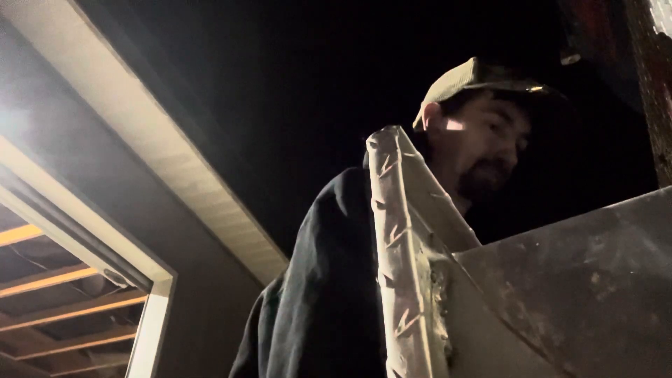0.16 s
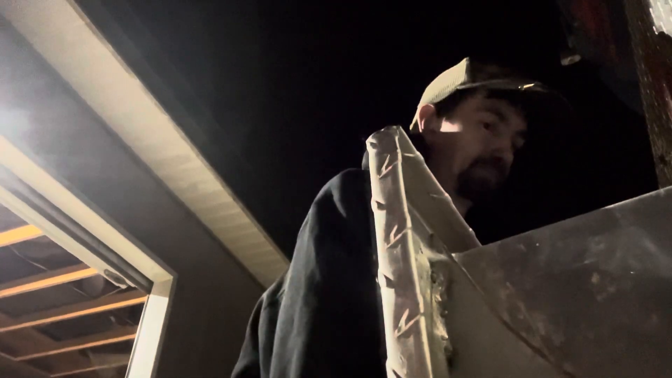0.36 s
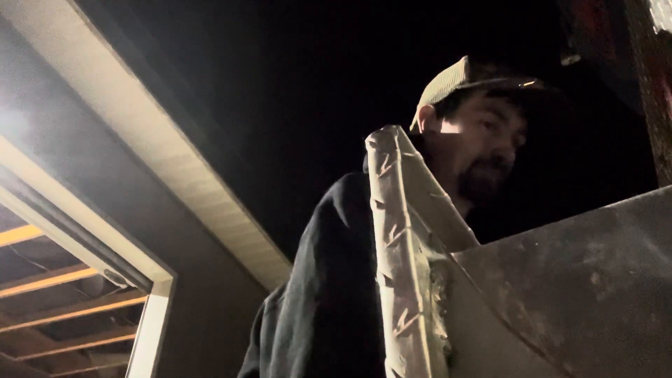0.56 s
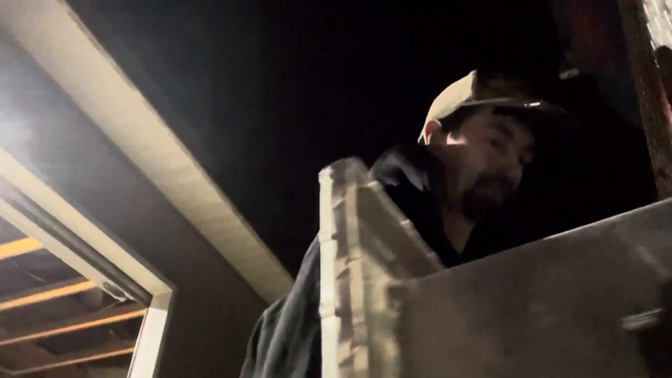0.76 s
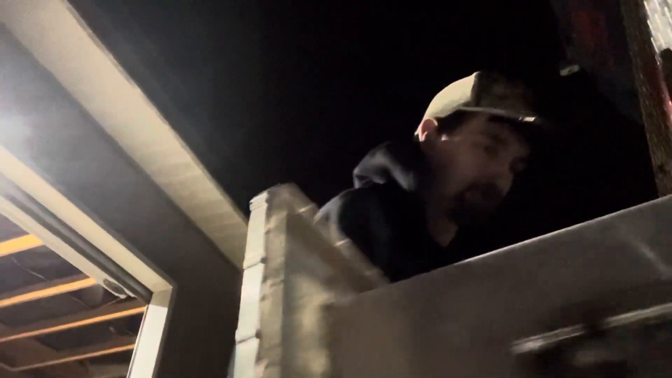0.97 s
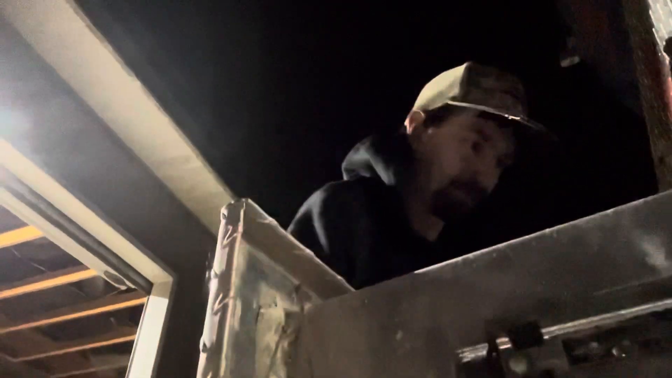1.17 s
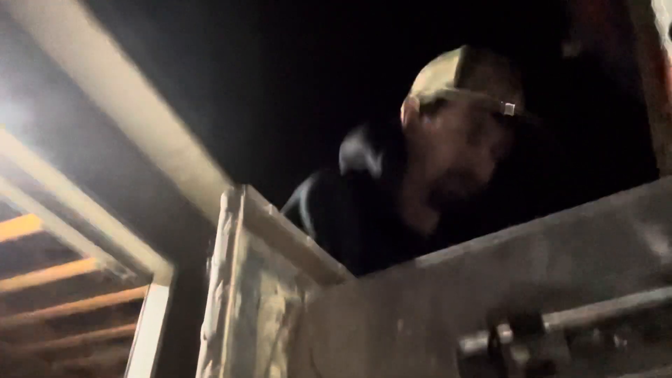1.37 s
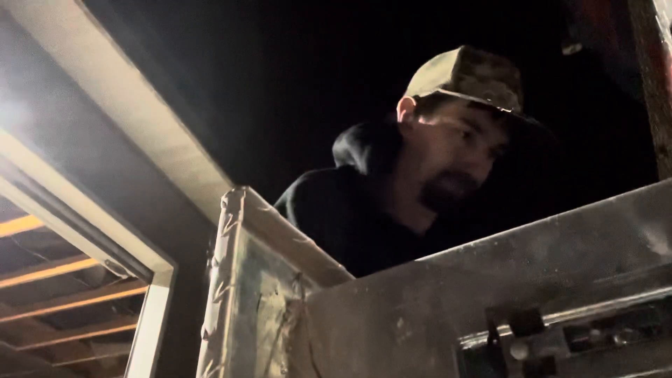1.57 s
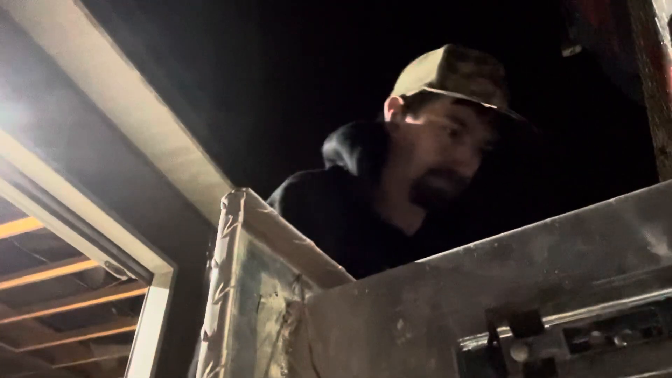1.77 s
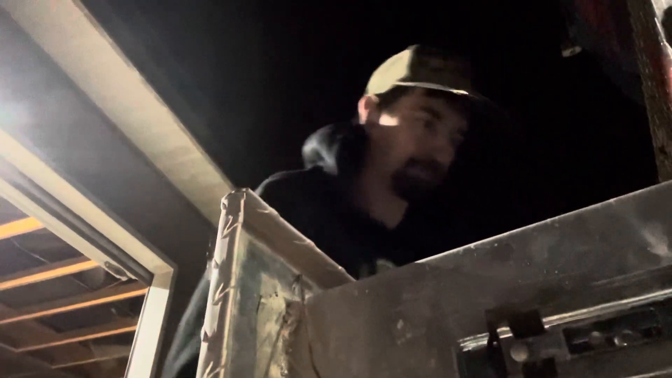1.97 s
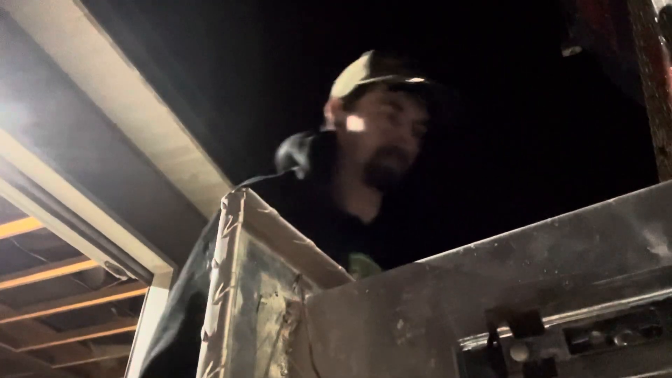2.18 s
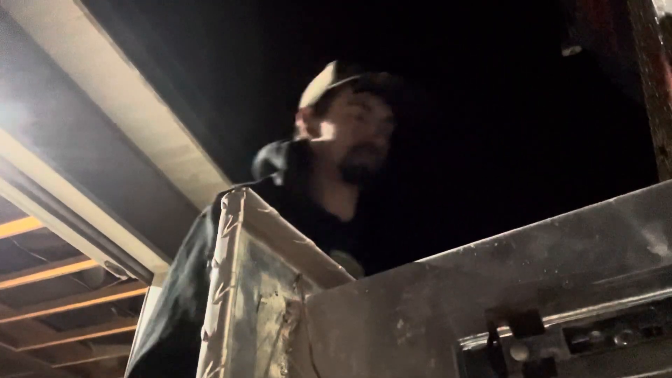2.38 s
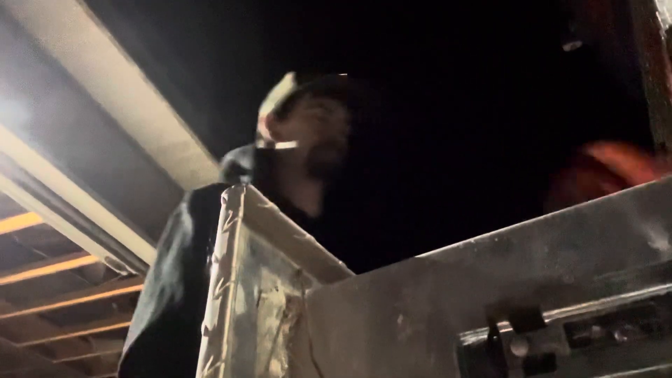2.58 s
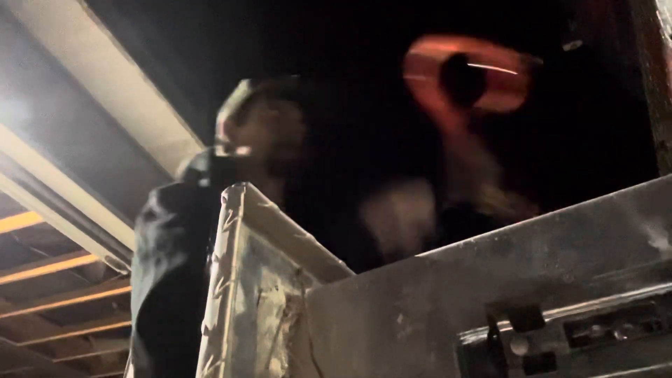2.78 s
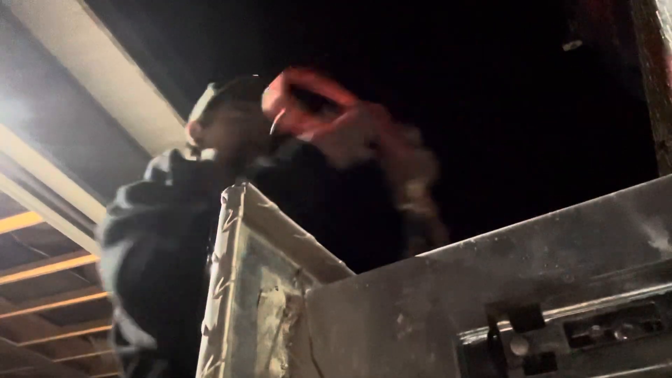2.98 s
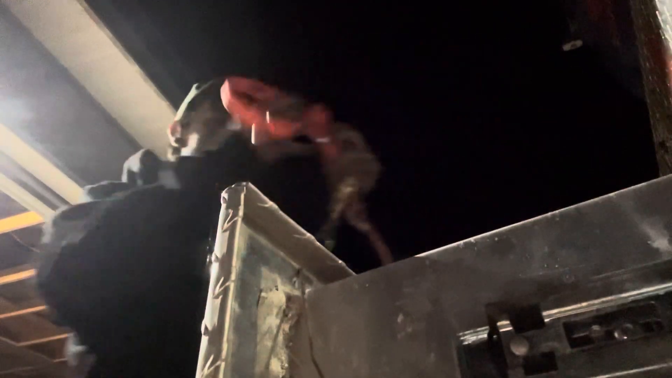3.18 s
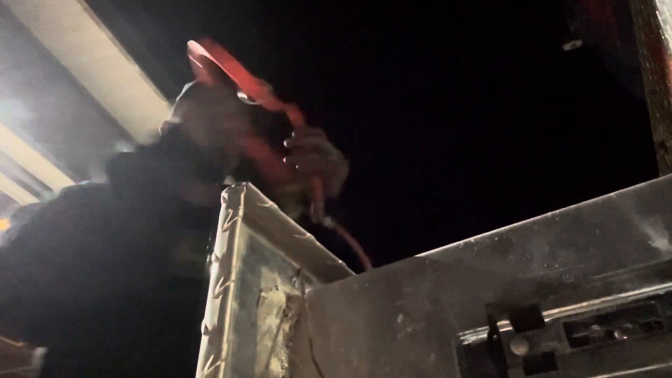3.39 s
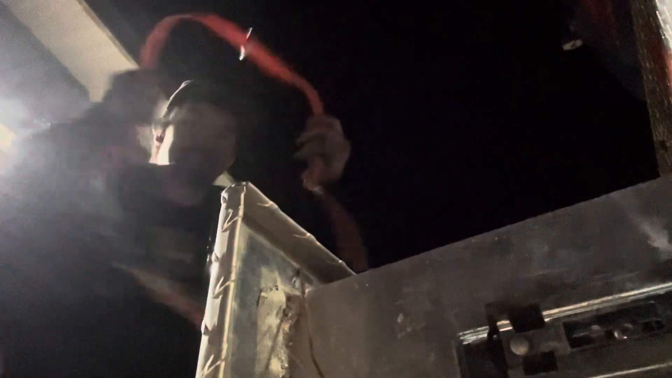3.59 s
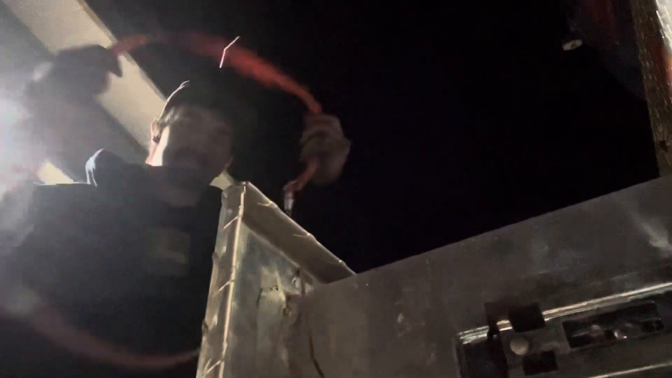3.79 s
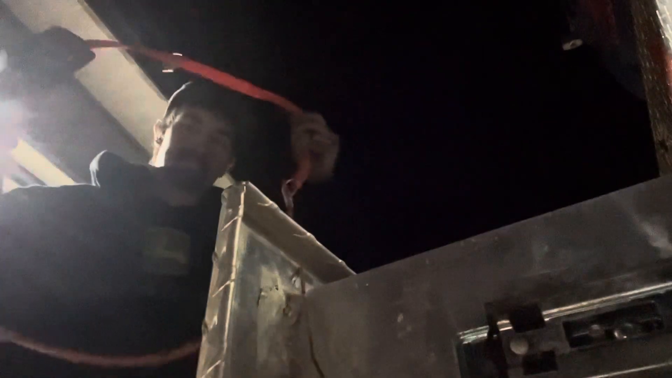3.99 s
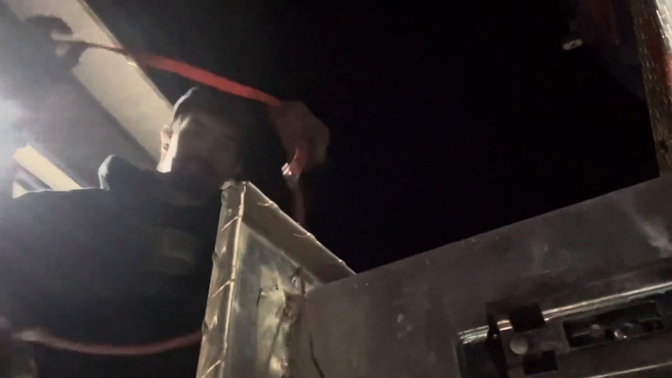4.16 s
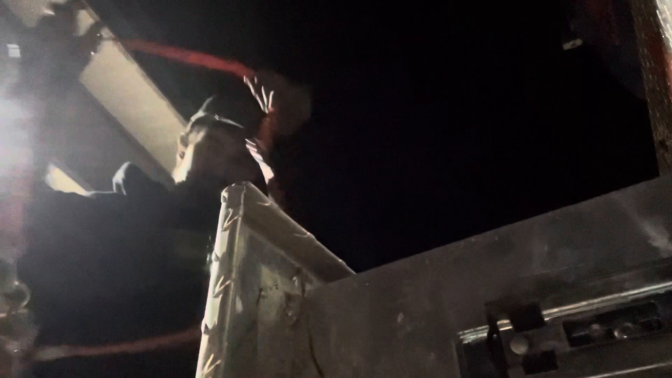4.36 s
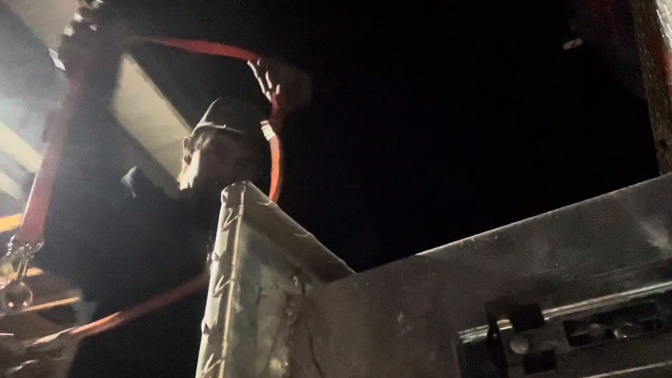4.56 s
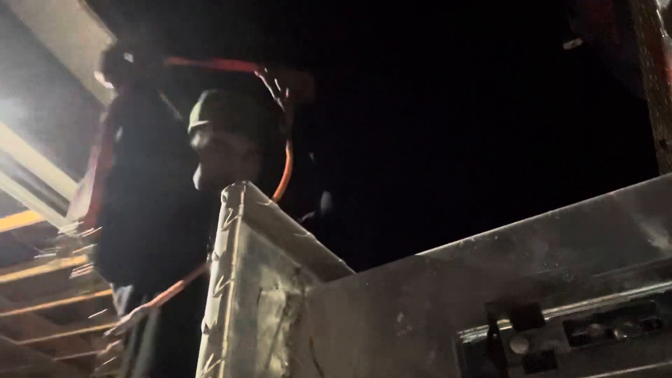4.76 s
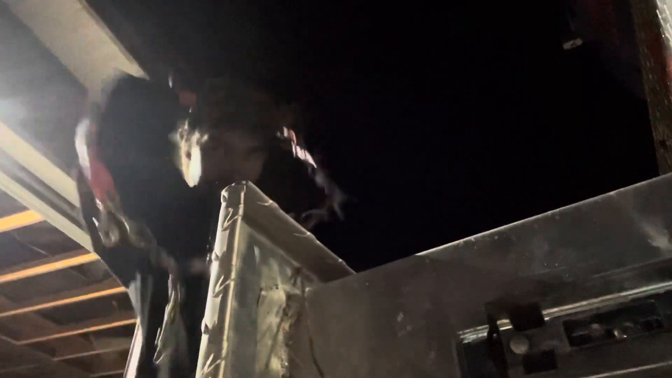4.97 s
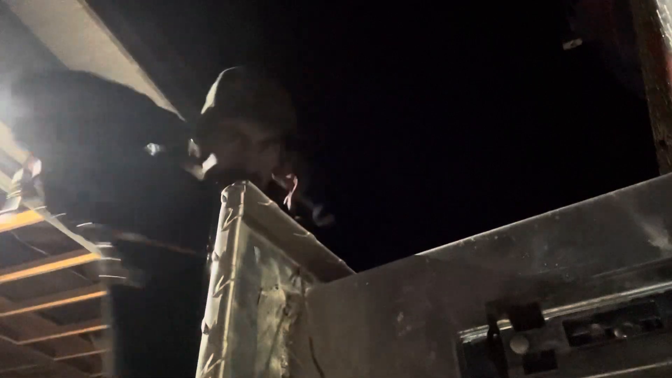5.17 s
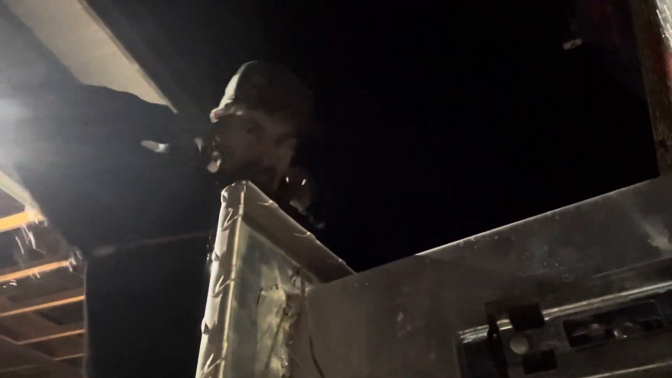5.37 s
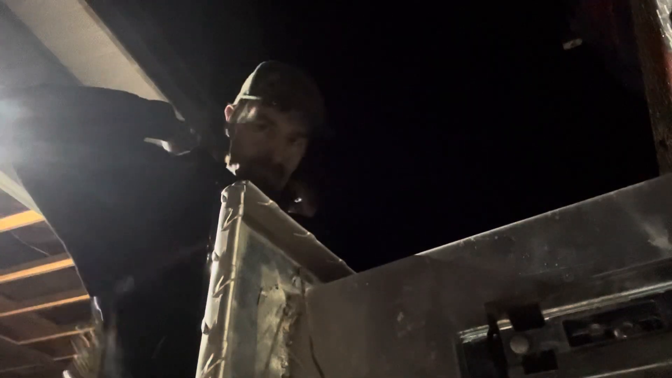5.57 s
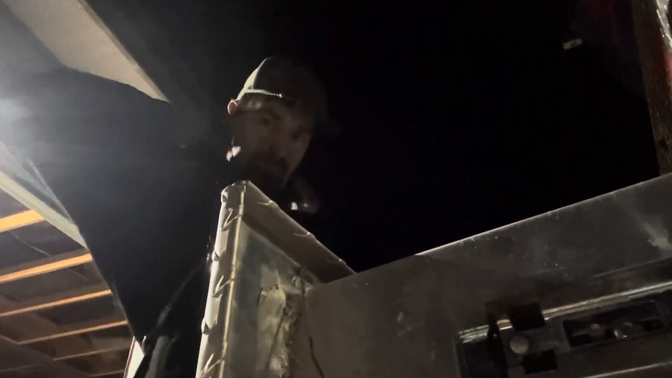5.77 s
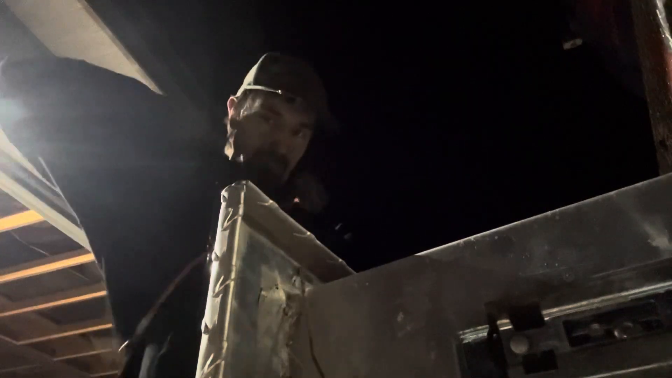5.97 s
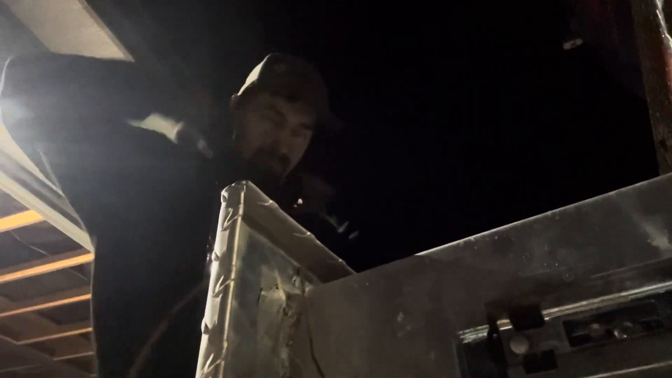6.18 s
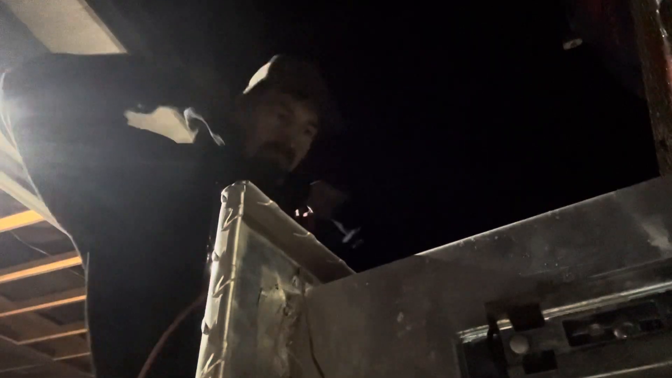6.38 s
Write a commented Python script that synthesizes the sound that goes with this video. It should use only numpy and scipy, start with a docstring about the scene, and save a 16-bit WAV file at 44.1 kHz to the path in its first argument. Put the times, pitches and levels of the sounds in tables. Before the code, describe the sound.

Quiet night air and a low wavering hum, then a tinny metal edge rasps harder and harder while the panel shakes and booms. A cluster of hard metallic blows rings briefly as the latch falls. Long, quavering squeals from a dog follow, slightly left, with short boxy echoes. Steel snap hooks tick and tinkle among faint webbing rustles, ending in ticks and a light paw scuff. Close stereo microphones.

```python
"""First a rough scrape as the aluminium door of a dog box is dragged open at night; then its latch clanks.
A dog whines thinly while a leash is pulled through the hands and its steel snap hooks clink.
Scrape, rustle, hiss and night air are shaped noise; metal is a sum of dying tones.
The whine is a gliding set of harmonics with echoes; a low, wavering hum is a single tone.
Two listening ports sit close beside the door."""
import sys
import numpy as np
from scipy import signal
from scipy.fft import rfft, irfft, next_fast_len
from scipy.io import wavfile
from scipy.ndimage import uniform_filter1d

SR = 44100
rng = np.random.default_rng(int(sys.argv[2]) if len(sys.argv) > 2 else 0)


def store_wav(level_fs):
    """Save 16-bit WAV to argv[1]."""
    pcm = np.round(np.clip(np.atleast_2d(level_fs), -1, 1) * 32767)
    wavfile.write(sys.argv[1], SR, pcm.T.astype(np.int16))


N = 284004

# Main tones of the door and box. Each row: pitch in Hz, level in dB, time to die by 60 dB in seconds.
DOOR_MODES = [(191.5, -5.5, 0.94), (206, -8, 0.31), (350.5, -2.5, 0.18), (368, -7, 0.99), (441, -2.5, 0.24),
              (504, -5, 0.18), (537, -2, 0.2), (750, -13.5, 0.12), (1077, -5, 0.27), (1244, -10, 0.21),
              (2198, -1.5, 0.21)]
# Colour of the sheet's dense upper tones. Each row: frequency in Hz, level in dB per Hz.
PANEL = [(120, -21), (200, -10), (400, -1), (850, -5.5), (1300, -7), (2300, -12.5), (4000, -16),
         (8000, -28)]
# Colour of the box's boom and floor. Each row: frequency in Hz, level in dB per Hz.
BOARDS = [(160, 2), (225, 14.5), (300, -4), (420, 6), (700, -11.5), (2200, -22.5)]
# Colour of the dog's breath and of most harmonics. Each row: frequency in Hz, level in dB.
MUZZLE = [(1600, -11), (2100, 0), (2400, 0), (2600, -8), (2970, -3), (3250, -22), (3850, -11), (4700, -36),
          (5700, -21), (6500, -38)]

SHAKE_S, SHAKE_LENGTH_S = 0.54, 0.49   # the panel shakes while the door is dragged
DRAG_DB_PER_S = 21.5   # average growth of the force during a drag
PULL_RISE_DB_PER_S, PULL_FALL_DB_PER_S = 103, 82   # how fast soft sounds come and go


# Tools that the sources share

def from_db(db):
    """Turn decibels into gain."""
    return np.exp(np.asarray(db) * (np.log(10) / 20))


def rms_one(x):
    """Scale to unit power."""
    return x / np.sqrt(np.mean(x ** 2) + 1e-20)


def in_time(rows):
    """Draw straight lines between timed rows, giving each column at every sample."""
    s, *columns = np.transpose(rows)
    return [np.interp(np.arange(N) / SR, s, c) for c in columns]


def gain_at(points, hz):
    """Read the gain of a dB spectrum at these frequencies."""
    at, db = np.transpose(points)
    return from_db(np.interp(np.log(hz + 1), np.log(at), db))


def drift(per_s):
    """Wander at random by about one unit, with this many turning points a second."""
    knots = np.arange(N) / SR * per_s
    return rms_one(np.interp(knots, np.arange(N // 10), rng.standard_normal(N // 10)))


def colour(x, spectrum):
    """Give noise a spectrum that falls steeply beyond both ends; unit power."""
    size = x.shape[-1]
    hz = np.arange(size // 2 + 1) * SR / size + 1
    ends = np.minimum(1, np.minimum(hz / spectrum[0][0], spectrum[-1][0] / hz)) ** 4
    return rms_one(irfft(rfft(x) * gain_at(spectrum, hz) * ends, size))


def noise_pair(apart, size=N):
    """White noise at two ports; apart is the share of power they do not have in common."""
    common, *own = rng.standard_normal((3, size))
    apart = np.clip(apart, 0, 1)
    return np.sqrt(1 - apart) * common + np.sqrt(apart) * np.array(own)


def ports(x, lag_s, pan_db):
    """Place a sound: the left port hears it lag_s later and pan_db louder than the right."""
    size = next_fast_len(N + SR // 10)
    lean = np.sqrt(from_db(pan_db))
    lag = np.exp(-2j * np.pi * np.fft.rfftfreq(size) * SR * lag_s)
    return irfft(rfft(x, size) * [lean * lag, np.ones_like(lag) / lean], size)[:, :N]


def dying(t60, size=SR):
    """Exponential decay from one, losing 60 dB in t60 seconds."""
    return from_db(-60 * np.arange(size) / SR / t60)


def ringing(modes):
    """Struck metal: a sum of dying tones of alternating sign, lasting at most one second."""
    out = np.zeros(SR)
    for k, (hz, db, t60) in enumerate(modes):
        size = min(SR, int(2 * t60 * SR))
        tone = np.sin(2 * np.pi * hz / SR * np.arange(size))
        out[:size] += (-1) ** k * from_db(db) * dying(t60, size) * tone
    return out


def burst(spectrum, t60, tail_db, tail_t60, apart):
    """Countless modes struck at once: a fast decay, then a weak tail from the surroundings."""
    decay = dying(t60) + from_db(tail_db) * dying(tail_t60)
    return colour(noise_pair(apart, size=SR), spectrum) * decay


def add(track, s, sound):
    """Mix a sound into a track at a time in seconds."""
    start = max(round(s * SR), 0)
    track[:, start:start + sound.shape[-1]] += sound[..., :N - start]


def friction(slips_per_s, rough_db, apart):
    """Stick and slip: noise that comes in uneven little surges."""
    surges = from_db(rough_db * np.clip(drift(slips_per_s), -2, 2))
    return rms_one(noise_pair(apart) * surges)


def soften(x):
    """Low-pass the sound steeply at 12300 Hz, leaving scrape and rustle without the highest treble."""
    return signal.sosfilt(signal.butter(10, 12300, fs=SR, output="sos"), x)


def stroke(start_s, length_s, db, rise_db_per_s, fall_db_per_s, swell_db_per_s=0):
    """Gain of one gesture: it rises up to the start, holds or swells for its length, then dies away."""
    t = np.arange(N) / SR - start_s
    before, after = np.maximum(-t, 0), np.maximum(t - length_s, 0)
    progress = np.sin(np.pi / 2 * np.clip(t, 0, length_s) / length_s) ** 2   # eases in and out
    held = swell_db_per_s * length_s * progress
    return from_db(np.maximum(db + held - rise_db_per_s * before - fall_db_per_s * after, -200))


# The door

def door_swing(rumble_db=-2, rasp_db=0, ring_db=-12):
    """The seal pops free; the dragging edge rasps and the shaken panel rumbles on after the drag."""
    # The edge rubs on the frame. Each row: start in seconds, length in seconds, level before the swell in dB.
    scrapes = [(0.606, 0.43, -31.5), (1.308, 0.039, -56)]
    # Colour of the rasp. Each row: frequency in Hz, level in dB per Hz.
    rasp_colour = [(600, -1.5), (1100, -7), (2400, -8.5), (3200, -17), (4200, -14.5), (9400, -23),
                   (12000, -26.5)]
    # Ring of the seal's pop. Each row: pitch in Hz, level in dB, time to die by 60 dB in seconds.
    pop_modes = [(894, -14, 0.03)]
    pop_s = 0.5642
    grip_db_per_s, slip_db_per_s = 280, 218.5   # how fast the rasp comes and goes
    edge = sum(stroke(s, length, db, grip_db_per_s, slip_db_per_s, DRAG_DB_PER_S)
               for s, length, db in scrapes)
    ring = from_db(ring_db) * through_door(friction(slips_per_s=90, rough_db=3, apart=0.4))
    rasp = from_db(rasp_db) * colour(through_sheet(grating()), rasp_colour)
    out = from_db(rumble_db) * panel_rumble() + edge * (soften(biting(rasp)) + ring)
    add(out, pop_s, ringing(pop_modes))
    return out


def through_door(force):
    """A running force keeps setting off the door's modes; unit power."""
    return rms_one(signal.fftconvolve(force, ringing(DOOR_MODES)[None])[:, :N])


def grating(catches_per_s=110, catch_db=-7):
    """The edge slides with a fine rasp and now and then catches on a burr."""
    caught = rng.random(N) < catches_per_s / SR
    catches = rms_one(rng.uniform(-1, 1, N) * caught)
    return friction(slips_per_s=980, rough_db=1.5, apart=0.62) + from_db(catch_db) * catches


def through_sheet(force, t60=0.028):
    """The countless modes of thin aluminium give a running force a tinny grain."""
    sheet = rng.standard_normal(SR) * dying(t60)
    grain = rms_one(signal.fftconvolve(force, sheet[None])[:, :N])
    return rms_one(force + .5 * grain)


def biting(rasp, low_hz=3000, light_db=-5):
    """The rasp starts thin and fills out below low_hz as the edge bites deeper."""
    low = signal.sosfiltfilt(signal.butter(2, low_hz, fs=SR, output="sos"), rasp)
    depth_db, = in_time([(SHAKE_S, light_db), (SHAKE_S + SHAKE_LENGTH_S, 0)])
    return rasp + (from_db(depth_db) - 1) * low


def panel_rumble(fall_growth=0.55):
    """The dragged panel shakes harder and harder, then rings down; each higher octave dies sooner."""
    # Colour of the rumble. Each row: frequency in Hz, level in dB per Hz.
    rumble_colour = [(45, -13), (173, 2), (284, -2), (422, 2), (540, -5), (702, -15.5), (1200, -10.5),
                     (1560, -44)]
    start_db = -30.5   # before the swell
    rise_db_per_s, fall_at_200_hz = 1100, 50.5   # both in dB per second
    shake = colour(friction(slips_per_s=89, rough_db=0.5, apart=0.098), rumble_colour)
    out = 0
    for hz in 100 * 2 ** np.arange(5):
        # peel off one octave from what is left
        part = signal.sosfiltfilt(signal.butter(3, hz * np.sqrt(2), fs=SR, output="sos"), shake)
        shake = shake - part
        fall = fall_at_200_hz * (hz / 200) ** fall_growth
        out = out + part * stroke(SHAKE_S, SHAKE_LENGTH_S, start_db, rise_db_per_s, fall, DRAG_DB_PER_S)
    return out


def door_knocks(modes_db=-14, panel_db=-8, crack_db=-8, boom_db=-29, boom_t60=1.3):
    """Metal meets metal with a crack; the sheet crashes, its modes ring on and the box booms."""
    # Blows on the door, before mixing. Each row: time in seconds, panel strength in dB, crack strength in dB.
    knocks = [(0.402, -41.5, -98), (0.825, -20, -21), (1.132, -42, -30.5), (1.155, -35.5, -57),
              (1.327, -38.5, -59), (2.2606, -23, -29), (2.33, -14, -5), (2.3336, -11, -12.5),
              (2.348, -11, -9), (2.363, -23.5, -20.5), (3.4365, -43, -47), (6.203, -44, -36)]
    # Colour of the crack. Each row: frequency in Hz, level in dB per Hz.
    crack_colour = [(700, -16.5), (2200, 2.5), (3100, -14.5), (4200, 2.5), (6000, -0.5), (7400, 5),
                    (9500, 2), (12000, -3.5), (14000, -29.5)]
    out = np.zeros((2, N))
    clang = clanging()
    for s, body_db, sharp_db in knocks:
        # every blow excites the modes a little differently
        varied = [(hz, db + rng.normal(0, 1), t60) for hz, db, t60 in DOOR_MODES]
        modes = from_db(modes_db) * ringing(varied)
        sheet = from_db(panel_db) * burst(PANEL, t60=0.15, tail_db=-28.5, tail_t60=1.0, apart=0.65)
        boom = from_db(boom_db) * colour(rng.standard_normal(SR), BOARDS) * dying(boom_t60)
        crack = burst(crack_colour, t60=0.035, tail_db=-19.0, tail_t60=0.24, apart=1.0)
        body = modes + clang + sheet + boom
        add(out, s, from_db(body_db) * body + from_db(sharp_db + crack_db) * crack)
    return out


def clanging(level_db=-29, t60=0.28):
    """The sheet's many upper modes ring on and beat against each other."""
    upper = np.geomspace(600, 4500, 48) * rng.uniform(.97, 1.03, 48)
    modes = [(hz, 20 * np.log10(gain_at(PANEL, hz)), t60) for hz in upper]
    return from_db(level_db) * ringing(modes)


# The dog

def dog(echo_db=-6, box_t60=0.2):
    """Air turns into a whine, and dense echoes from the walls of the box blend with the gliding pitch."""
    # Two long whines, one list each. Each row: time in seconds, pitch in Hz.
    pitches = [
        [(2.55, 785), (2.83, 768.8), (2.97, 802), (3.12, 796), (3.3, 772.6), (3.58, 746), (3.87, 716), (4, 666)],
        [(5.35, 763), (5.61, 751), (5.73, 721), (5.88, 719), (6.07, 672)],
    ]
    # Swells and dips of their third harmonic. Each row: time in seconds, level in dB.
    levels = [
        [(2.5, -71), (2.83, -70), (2.96, -62.5), (3.02, -73), (3.12, -56.5), (3.25, -73.5), (3.36, -60),
         (3.42, -69), (3.49, -56), (3.63, -74), (3.74, -61.5), (3.86, -62.5), (4.05, -89)],
        [(5.32, -66), (5.37, -66.5), (5.48, -61), (5.57, -62.5), (5.64, -78), (5.69, -61), (5.98, -64.5),
         (6.15, -74)],
    ]
    # Strength of the other harmonics: one value in dB for each whine.
    brights_db = [-3.5, -3]
    air_level = stroke(2.45, 0.37, -65.5, PULL_RISE_DB_PER_S, PULL_FALL_DB_PER_S)
    air = air_level * colour(rng.standard_normal(N), MUZZLE)
    voice = air + sum(map(whine, pitches, levels, brights_db))
    walls = noise_pair(0.17, size=SR) * dying(box_t60)
    echo = signal.fftconvolve(voice[None], walls / np.linalg.norm(walls[0]))[:, :N]
    return voice + from_db(echo_db) * echo


def whine(pitch_rows, level_rows, bright_db, effort_s=0.32):
    """A thin, quavering squeal led by its third harmonic; the others follow the slower effort."""
    quaver, wavers_per_s = 0.008, 16   # share of the pitch; unsteadiness of the other harmonics
    (pitch,), (db,) = in_time(pitch_rows), in_time(level_rows)
    t = np.arange(N) / SR
    level = from_db(db) * ((t > level_rows[0][0]) & (t < level_rows[-1][0]))
    effort = np.minimum(uniform_filter1d(level, int(effort_s * SR)), 10 * level)
    phase = 2 * np.pi * np.cumsum(pitch * (1 + quaver * drift(120))) / SR
    others = sum(gain_at(MUZZLE, k * pitch) * from_db(3.5 * drift(wavers_per_s)) * np.sin(k * phase)
                 for k in (2, 4, 5, 6, 7))
    third = level * from_db(1.5 * drift(70)) * np.sin(3 * phase)
    return np.sqrt(2) * (third + effort * from_db(bright_db) * others)


def shuffle(rise_db_per_s=200, fall_db_per_s=150):
    """Paws rub on the box floor: rough friction coloured by the boards."""
    paws = colour(friction(slips_per_s=60, rough_db=-1.0, apart=0.98), BOARDS)
    return stroke(6.15, 0.11, -47, rise_db_per_s, fall_db_per_s) * paws


# The leash and its hooks

def snap_hooks(tick_db=-7, ring_db=0, parts_db=7, free_s=0.022, firm_db=-30, free_t60=0.11):
    """Each touch ticks and rings the hook, small parts join in, and the strap soon stills the ring."""
    # Touches, short where the hook is held and long where it hangs free.
    # Each row: time in seconds, strength in dB, ring pitch in Hz, time to die by 60 dB (before the strap) in s.
    clinks = [(1.8386, -53, 9700, 0.041), (1.8904, -46, 10570, 0.034), (2.6326, -35.5, 9700, 0.004),
              (2.6817, -40, 9430, 0.0023), (3.341, -29.5, 10000, 0.0016), (3.36, -33, 9720, 0.001),
              (3.4607, -31.5, 7900, 0.00087), (3.483, -39.5, 9700, 0.0081), (3.522, -22.5, 8460, 0.0024),
              (3.606, -40.5, 9350, 0.0053), (3.6656, -42.5, 9480, 0.009), (3.8345, -29, 8950, 0.043),
              (3.8838, -44.5, 10400, 0.019), (3.957, -43.5, 10040, 0.021), (4.8828, -40, 9000, 0.009),
              (5.3935, -43, 9530, 0.11), (5.423, -26, 9370, 0.16), (5.445, -27.5, 10230, 0.049),
              (5.4737, -32.5, 9600, 0.027), (5.538, -35, 8250, 0.18), (5.543, -29, 10140, 0.28),
              (5.5943, -37, 10540, 0.031), (6.0044, -49, 9400, 0.034), (6.0852, -25.5, 6650, 0.008),
              (6.1024, -26.5, 9900, 0.0049), (6.2053, -41, 7630, 0.044), (6.251, -31.5, 8500, 0.0013)]
    # Tones of a free hook. Each row: pitch in Hz, level in dB, time to die by 60 dB (before the strap) in s.
    hook_modes = [(3770, -29, 0.35), (5830, -14, 0.11), (9220, -1.5, 0.14), (15260, -5, 0.1)]
    out = np.zeros((2, N))
    settling = 1 / np.sqrt(1 + (np.arange(SR) / SR / free_s) ** 6)
    for s, db, hz, t60 in clinks:
        # touches weaker than firm_db stir the small parts less
        parts = from_db(parts_db + .5 * min(db - firm_db, 0)) * small_steel()
        hook = min(t60 / free_t60, 1) * ringing(hook_modes)
        ring = from_db(ring_db) * (ringing([(hz, 0, t60)]) + hook) + parts
        add(out, s, from_db(db) * (from_db(tick_db) * hook_tick() + ring * settling))
    return out


def hook_tick():
    """The dry tick of steel on steel: a very short noise burst."""
    # Colour of the tick. Each row: frequency in Hz, level in dB per Hz.
    tick_colour = [(2700, -8.5), (6000, 3.5), (9500, -9.5), (11500, -4), (14000, -11), (15700, -3.5)]
    return burst(tick_colour, t60=.01, tail_db=-20, tail_t60=.14, apart=.12)


def small_steel(low_hz=7300, high_hz=11000, t60=0.058):
    """Rings, springs and gates of the hooks: a cluster of close modes; unit energy."""
    cluster = ringing([(hz, 0, t60) for hz in rng.uniform(low_hz, high_hz, size=14)])
    return cluster / np.sqrt(np.sum(cluster ** 2))


def jingle(spread_db=15, tick_db=-8, t60=0.05):
    """Loose links touch at quick, uneven steps; each touch ticks and rings three fresh tones."""
    # Each row: start in seconds, length in seconds, level of the softest touch in dB, lowest ring pitch in Hz.
    rattles = [(1.78, 0.22, -79, 9340), (6.101, 0.03, -53.5, 7760), (6.205, 0.1, -56, 3244)]
    touches_per_s, top_hz = 140, 11000
    out = np.zeros((2, N))
    tick = from_db(tick_db) * hook_tick()
    for start, length, db, low_hz in rattles:
        touches = rng.random((int(length * touches_per_s), 5))
        for k, (late, force, *parts) in enumerate(touches):
            link = ringing([(low_hz + part * (top_hz - low_hz), 0, t60) for part in parts])
            add(out, start + (k + late) / touches_per_s, from_db(db + spread_db * force) * (link + tick))
    return out


def leash(fold_db=1.2):
    """Webbing and sleeves slide with a faint hiss that comes and goes as the cloth folds."""
    # Colour of the cloth. Each row: frequency in Hz, level in dB per Hz.
    cloth = [(1500, -2.5), (4000, 4), (10200, 2.5), (12500, -1.5)]
    rustle = soften(colour(friction(slips_per_s=130, rough_db=2.0, apart=0.68), cloth))
    return pulling() * from_db(fold_db * drift(10)) * rustle


def pulling():
    """How strongly leash or sleeves move: the loudest gesture at each moment, as a gain."""
    # Pulls of the leash through the hands. Each row: start in seconds, length in seconds, level in dB.
    pulls = [(1.96, 0.051, -71), (3.48, 0.47, -65), (4.22, 0.068, -67.5), (5.34, 0.33, -62.5),
             (6.1, 0.11, -55.5)]
    sleeves = (1.707, N / SR, -75)   # the sleeves keep rustling faintly to the end
    gains = [stroke(s, length, db, PULL_RISE_DB_PER_S, PULL_FALL_DB_PER_S)
             for s, length, db in list(pulls) + [sleeves]]
    return np.max(gains, axis=0)


def sizzle(low_hz=6700, high_hz=7500):
    """A thin, narrow band of high hiss swells and fades before the latch drops."""
    band_pass = signal.butter(2, [low_hz, high_hz], "band", fs=SR, output="sos")
    band = signal.sosfilt(band_pass, rng.standard_normal(N))
    return stroke(2.08, 0.14, -73, PULL_RISE_DB_PER_S, PULL_FALL_DB_PER_S) * rms_one(band)


# The background

def hum():
    """A low, wavering drone: one tone whose pitch and level wander around set curves."""
    # Each row: time in seconds, middle pitch in Hz, middle level in dB.
    hum_curve = [(0, 176.5, -48.5), (.35, 168.6, -57.5), (1.8, 182.7, -51), (2.1, 144.7, -72.5),
                 (4.1, 139, -61.5), (6.4, 146.6, -59)]
    hz, db = in_time(hum_curve)
    phase = 2 * np.pi * np.cumsum(hz + 3 * drift(28)) / SR
    return np.sqrt(2) * from_db(db + 1.6 * drift(16.0)) * np.sin(phase)


def night(level_db=-52.5, hiss_db=-86):
    """Low outdoor rumble and a trace of hiss, both steady coloured noise."""
    # Colour of the outdoor rumble. Each row: frequency in Hz, level in dB per Hz.
    night_colour = [(35, -18.5), (64, -2.5), (113, -10.5), (145, -5.5), (169, -14.5), (254, -17.5),
                    (858, -24.5), (2000, -44), (2600, -57.5)]
    hiss = colour(noise_pair(0.15), [(1000, -8), (12000, -14.5)])
    return from_db(level_db) * colour(noise_pair(0.76), night_colour) + from_db(hiss_db) * hiss


def scene():
    """The door panel is on the right, its edge and the hands nearly ahead; the dog is louder on the left."""
    door_lag_s, hand_lag_s = 0.00058, -0.0001   # the left port hears this much later
    edge_hz = 2100   # the whole panel radiates below this, its latch edge above
    door = door_swing() + door_knocks() + shuffle() + hum()
    panel = signal.sosfiltfilt(signal.butter(4, edge_hz, fs=SR, output="sos"), door)
    hands = snap_hooks() + leash() + jingle() + sizzle()
    placed_door = ports(panel, door_lag_s, -5.5) + ports(door - panel, hand_lag_s, -1)
    return placed_door + ports(hands, hand_lag_s, 0) + ports(dog(), 0, 5.5) + night()


def record(dry):
    """Cut the top of the treble steeply above 16600 Hz."""
    return signal.sosfiltfilt(signal.butter(16, 16600, fs=SR, output="sos"), dry)


dry = scene()
out = record(dry)
store_wav(out)
```